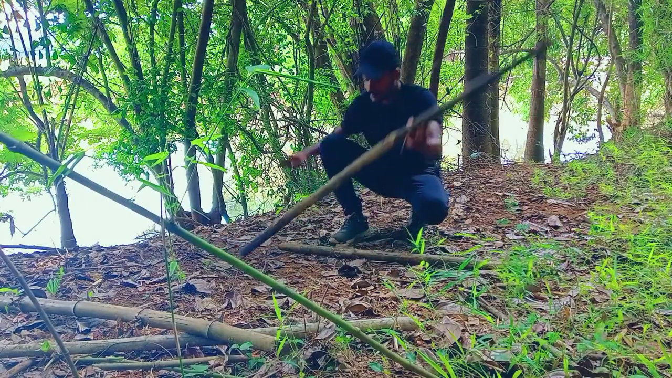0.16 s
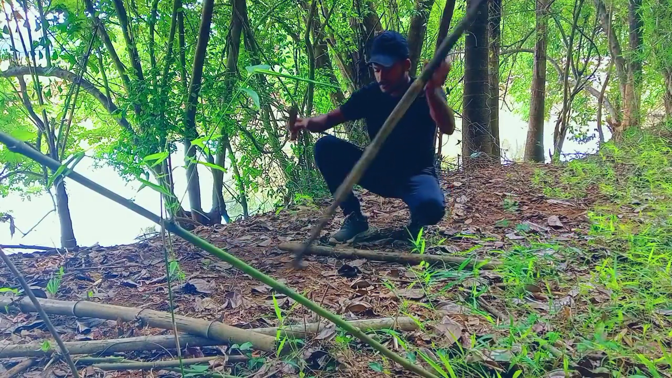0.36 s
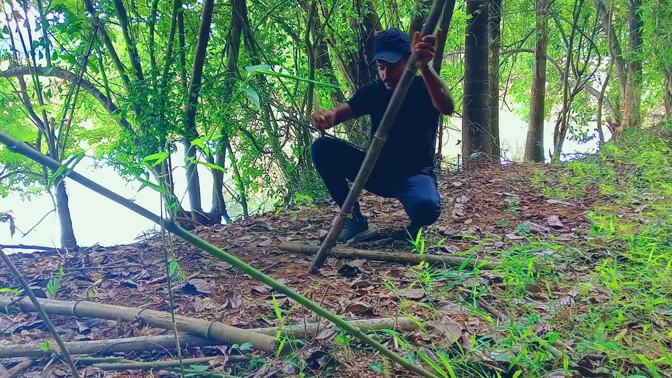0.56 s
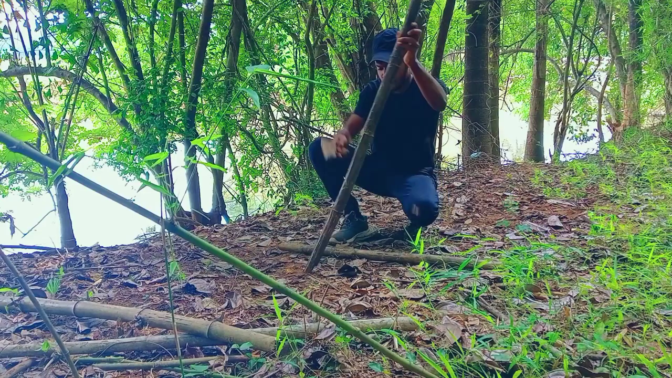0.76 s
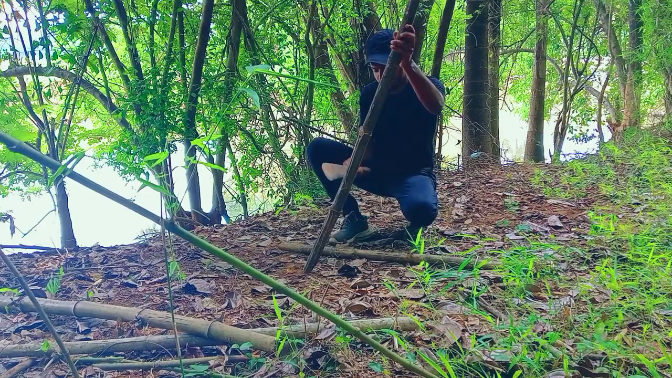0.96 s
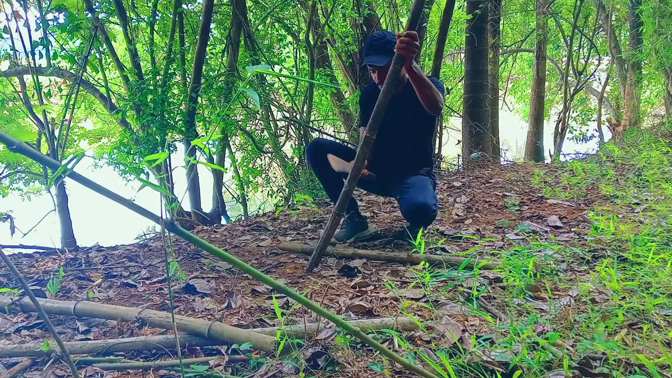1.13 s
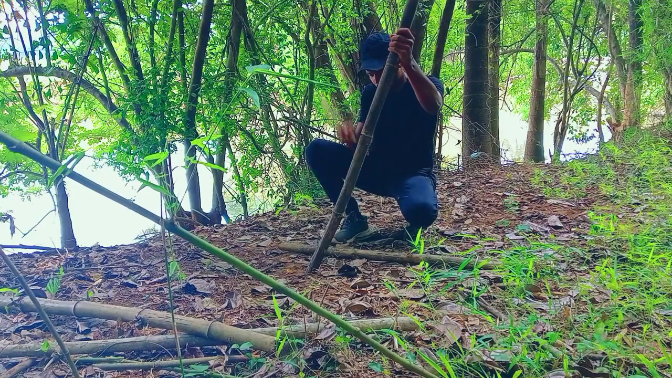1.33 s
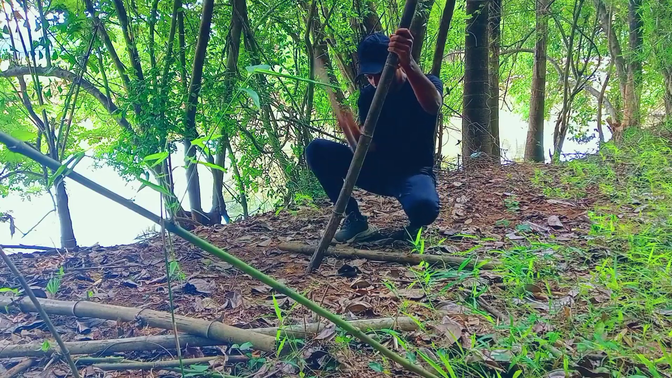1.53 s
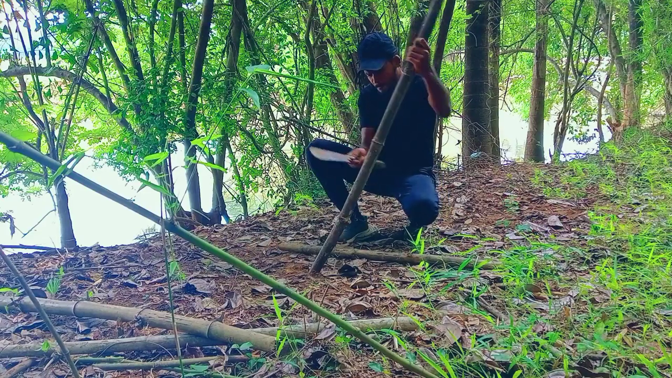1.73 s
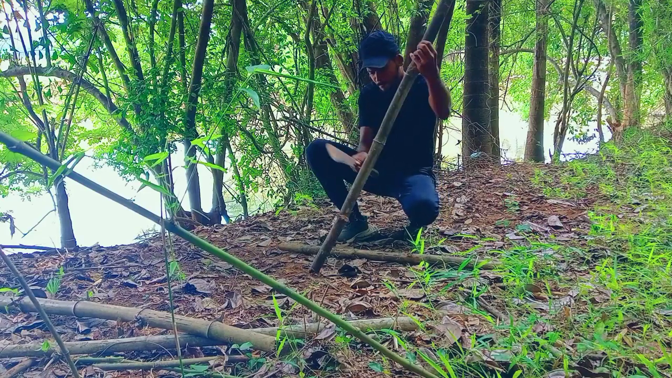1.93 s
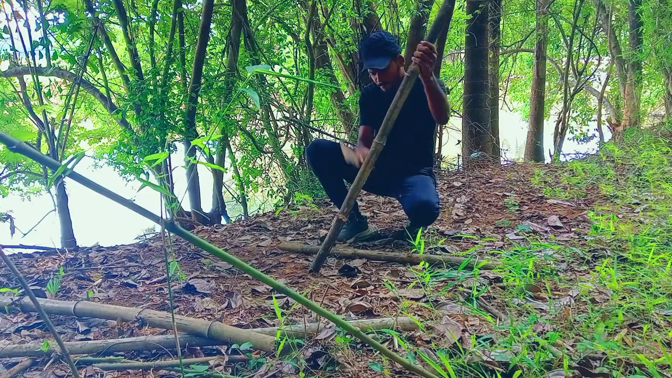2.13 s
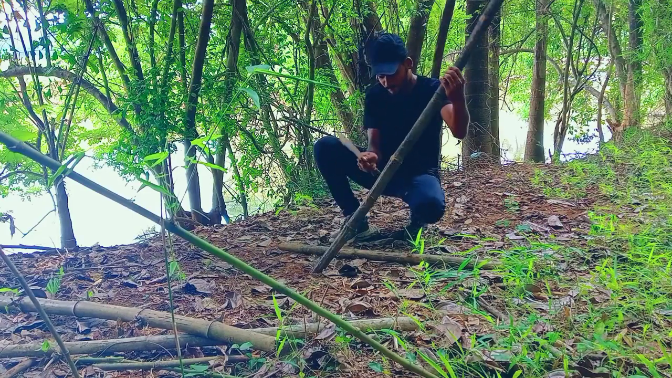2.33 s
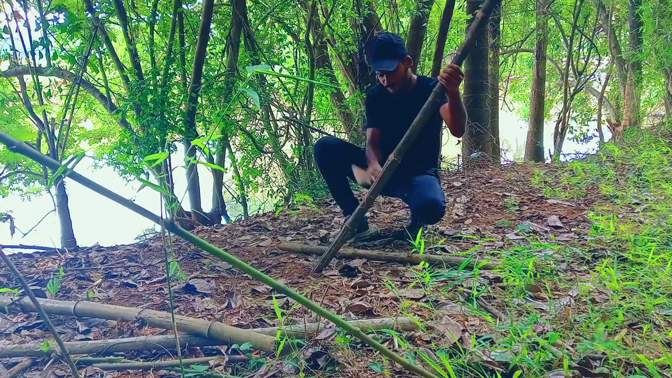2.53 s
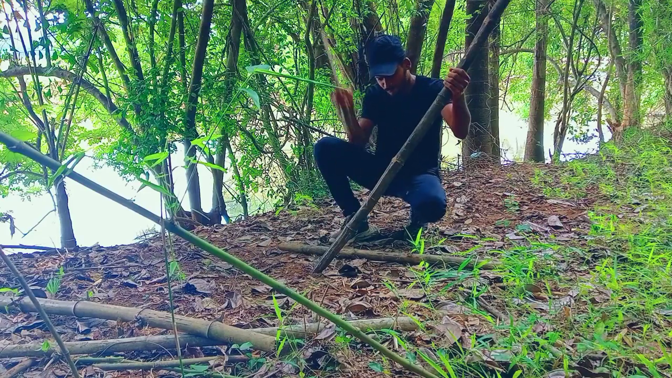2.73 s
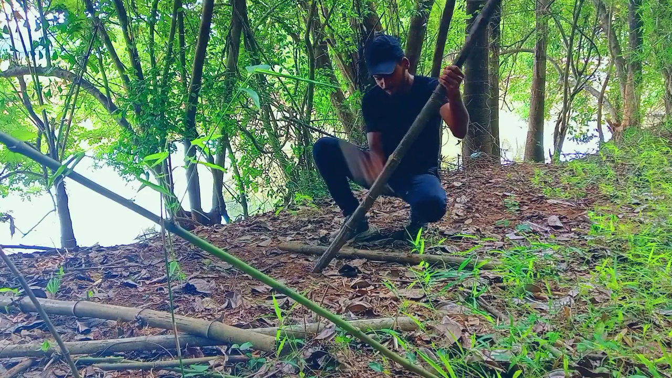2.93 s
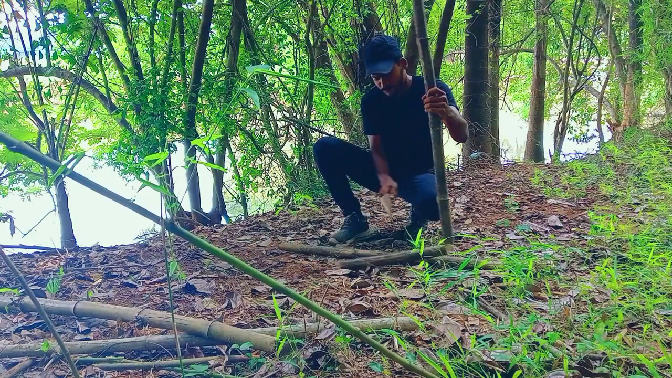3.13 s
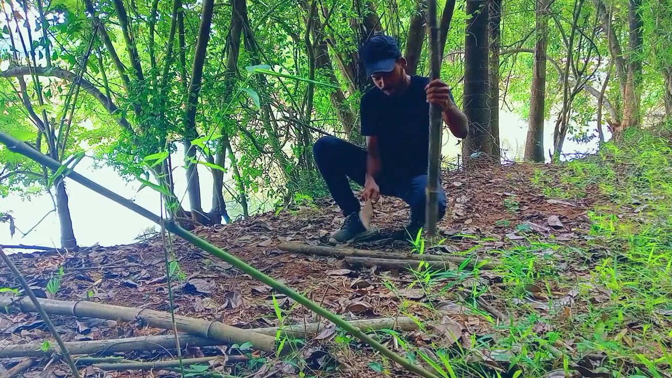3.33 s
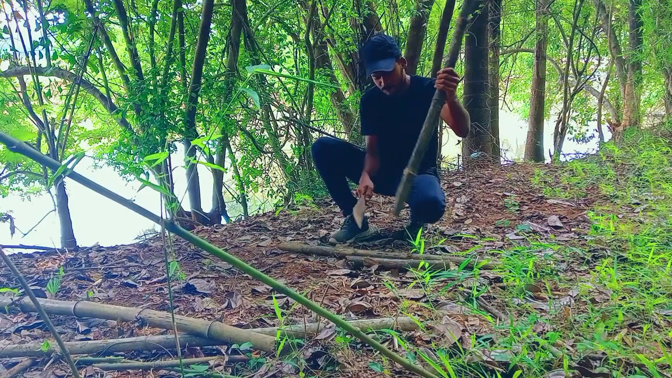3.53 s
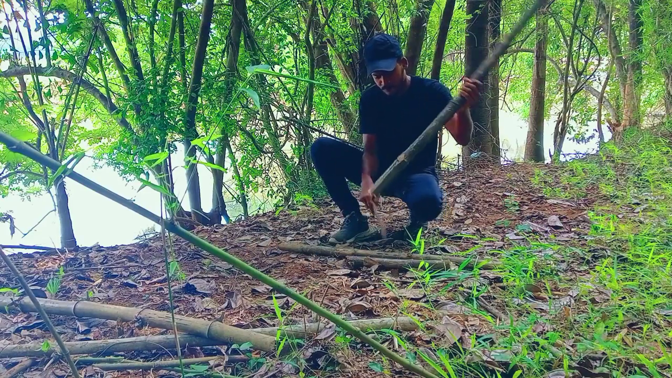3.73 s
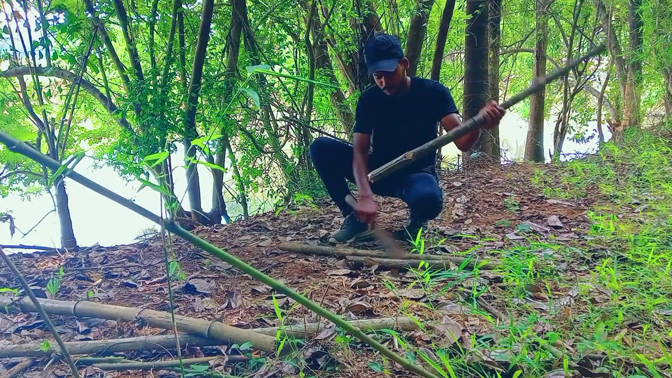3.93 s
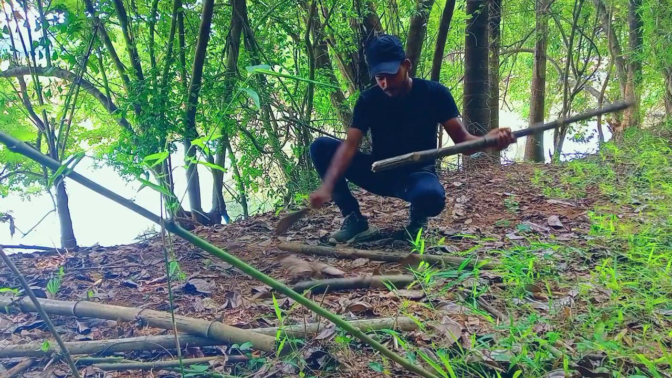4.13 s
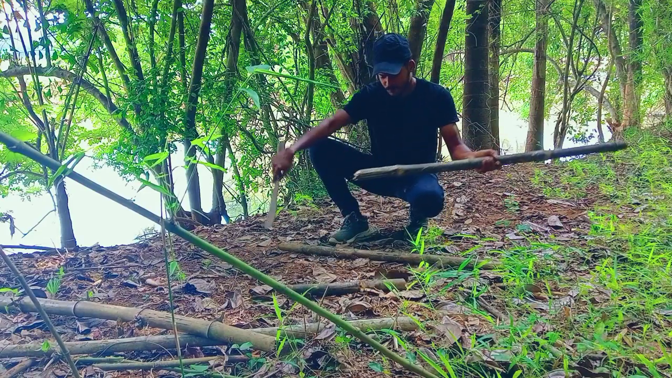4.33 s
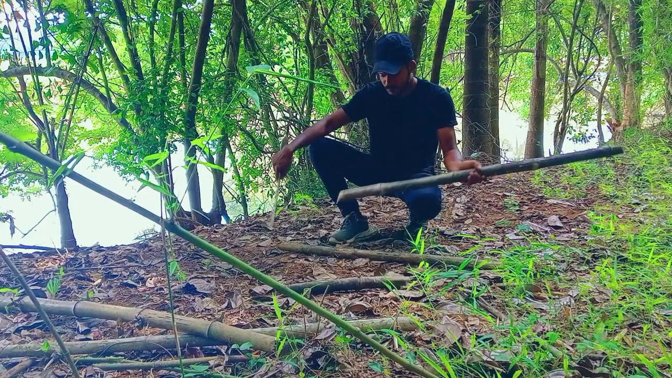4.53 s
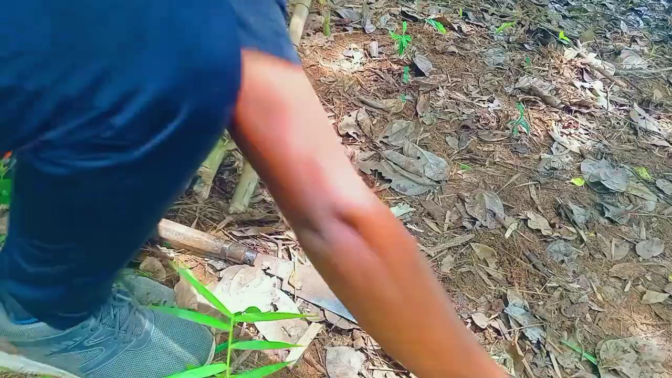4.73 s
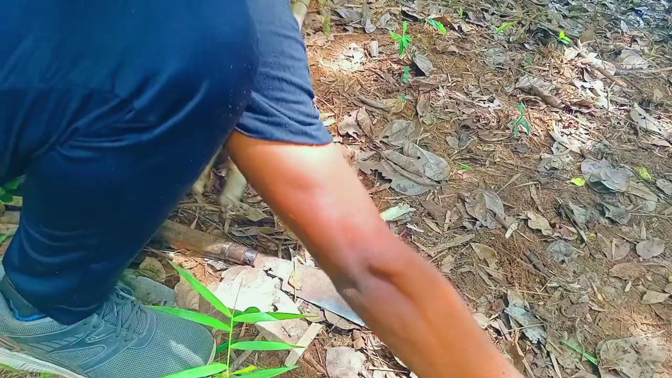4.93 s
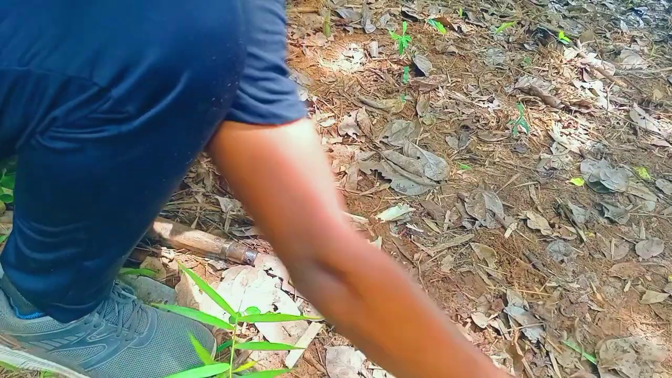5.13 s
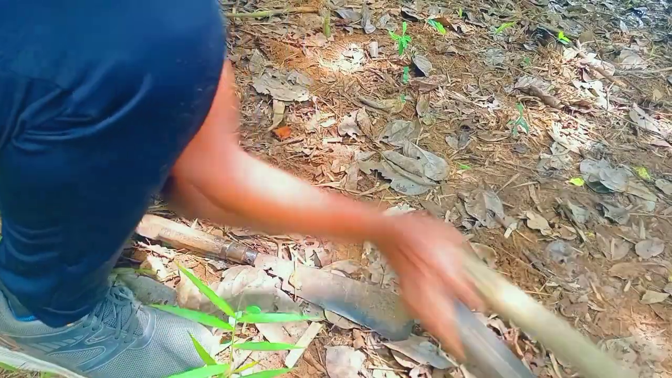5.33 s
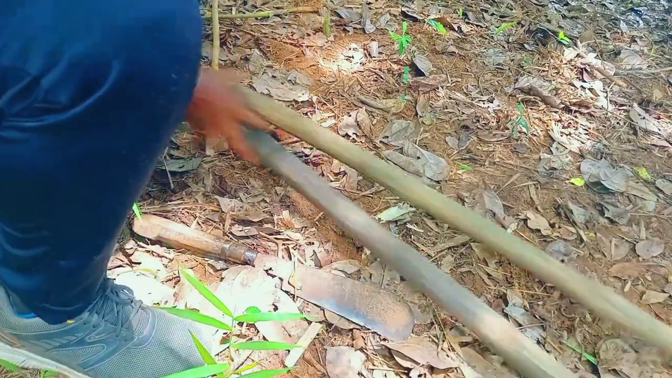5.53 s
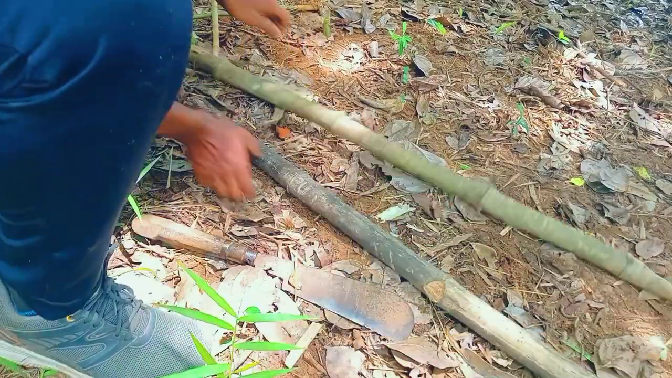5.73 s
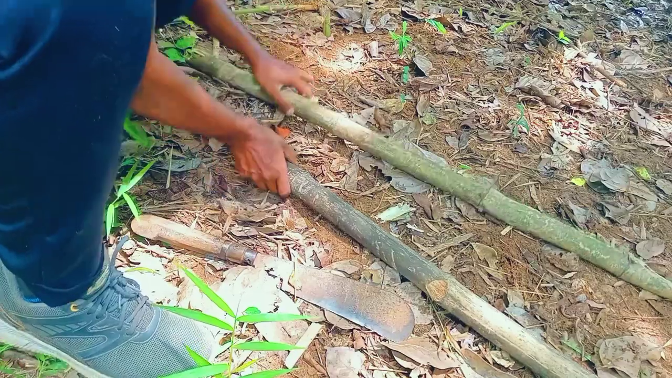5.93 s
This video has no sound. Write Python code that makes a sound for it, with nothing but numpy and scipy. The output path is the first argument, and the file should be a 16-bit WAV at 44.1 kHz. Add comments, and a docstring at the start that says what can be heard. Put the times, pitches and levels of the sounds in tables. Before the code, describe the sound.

A heavy blade chops a thin wooden pole at roughly half-second intervals outdoors, then sticks clack and scrape through dry leaves.

```python
"""A machete chops a green pole on a forest slope: noise cracks, ringing wood modes and low thuds.
Shaped hiss echoes each blow from the trunks. Sticks knock and drag through dry leaves: snaps and rubbing noise.
Gliding tones make soft low thumps and a far bird; narrow noise bands make insects.
Low noise makes the wind, and broad noise the far foliage.
A phone microphone with a hollow near 7.7 kHz and a peak near 10 kHz hears it all."""
import sys
import numpy as np
from scipy import signal
from scipy.fft import rfft, irfft, next_fast_len
from scipy.io import wavfile
from scipy.ndimage import uniform_filter1d, map_coordinates

SR = 44100
rng = np.random.default_rng(int(sys.argv[2]) if len(sys.argv) > 2 else 0)


def wrap_up_sound(samples):
    """Save the sound to the file named by the first command line argument, as 16-bit audio."""
    columns = np.atleast_2d(samples).T
    # keep every value between -1 and 1, then stretch to whole-number steps
    tamed = np.clip(columns, -1, 1)
    steps = np.round(tamed * 32767).astype(np.int16)
    wavfile.write(sys.argv[1], SR, steps)


N = 263277

# All levels are those of the layers before the microphone.
# bites of the blade: t/s, crack peak level/dB (nominal), crack length/s, crack tilt/(dB per octave),
# crack dull above f/Hz, lowest mode level/dB, lowest mode f/Hz, upper modes level/dB, favoured f/Hz,
# ring scale (multiplies the ring times), thud level/dB, thud f/Hz
BLADE_BITES = [(1.5836, -1, 0.0079, 0.3, 59900, -12.5, 548, -12.5, 1400, 0.34, -10, 206),
               (1.5853, -13, 0.0044, -3.5, 60500, -16, 331, -6, 900, 0.5, -18.5, 126.3),
               (2.008, -13, 0.0016, 1, 25000, -21, 431, -18, 1430, 0.58, -32, 157),
               (2.5, -7.5, 0.0051, -0.3, 40000, -11, 468, -6, 794, 0.54, -19, 247),
               (2.9595, -7, 0.0021, 0.5, 60000, -42, 680, -40, 2800, 0.14, -42, 157.2),
               (2.9618, -2.5, 0.0072, 1.1, 60500, -2, 650, -36, 1450, 0.2, -7, 159),
               (3.966, -2.5, 0.0079, 7.8, 8100, -6, 513, -6.5, 1600, 1, -31, 265)]
# sticks knocking on wood or ground: t/s, tick peak level/dB (nominal), lowest mode level/dB,
# lowest mode f/Hz, upper modes level/dB, favoured f/Hz, ring scale (multiplies the ring times)
STICK_KNOCKS = [(0.096, -38, -49, 468, -39, 2250, 1.14), (0.132, -41.5, -56, 490, -41, 2200, 0.9),
                (0.244, -41, -75, 520, -70, 2850, .9), (0.277, -43, -52, 510, -36.5, 2160, 0.72),
                (0.311, -64, -45.5, 520, -62, 1300, 0.95), (0.337, -48, -39.5, 517, -32, 2080, 0.71),
                (0.346, -62, -55, 536, -45.5, 1360, 2.2), (0.364, -57, -47, 545, -43, 2100, 0.99),
                (0.383, -58, -49, 540, -51, 1300, 1.1), (0.409, -47, -56, 706, -50, 2200, 1.9),
                (1.9912, -27, -66, 509, -59, 2500, 0.46), (2.454, -38, -55, 490, -45.5, 1970, 0.68),
                (3.269, -42, -41, 597, -43, 1290, 0.69), (3.913, -47, -31, 504, -29.5, 1260, 0.8),
                (3.922, -48, -40, 500, -34, 1280, 1.5), (3.994, -40, -36.5, 480, -19, 1970, 0.65),
                (4.017, -38, -22, 430, -19, 1360, 0.54), (4.134, -37, -41.5, 512, -44.5, 1030, 4.4),
                (4.156, -42, -40, 513, -32.5, 2070, 1.6), (4.207, -54, -49.5, 503, -45, 1300, 1.8),
                (4.879, -45, -54, 447, -28, 1520, 0.78), (5.221, -25.5, -24.5, 460, -14, 2570, 0.38),
                (5.373, -18.5, -27, 414, -27, 1490, 0.95), (5.413, -15, -31, 440, -22, 1990, 0.46),
                (5.4893, -10, -48, 444, -36, 2500, 0.29), (5.515, -35, -40, 447, -16, 2800, 0.28),
                (5.527, -24, -25, 461, -22.5, 1060, 2.87), (5.553, -16, -59, 444, -46, 2980, 0.52),
                (5.597, -28, -45, 450, -31, 2500, .4)]
# upper modes of the pole: f/Hz (before a small random shift in a blow), level/dB, t60/s at ring scale 1
POLE_MODES = [(773, -2, .03), (992, 0, 0.027), (1254, -3.5, 0.039), (1382, -6.5, 0.041),
              (2070, -2.5, 0.038), (2216, -7, 0.017), (2795, -2.5, 0.033), (4050, -3.5, 0.015)]
# colour of splitting fibres: f/Hz, level/dB (per Hz)
CRACK_COLOUR = [(300, -7.5), (1500, -11.5), (3200, -5.5), (4200, -9.5), (6000, -22), (10400, -28.5),
                (15000, -33)]
# hiss from trunks and flying chips after each blow; the slow swell at 2.968 s is the cut piece falling into the
# leaves: t/s, level/dB before the near boost, swell time constant/s, t60/s, # tilt/(dB per octave), lift of the
# strongest band/dB
ECHO_HISSES = [(1.586, -30.5, 0.004, 0.52, 3, 10.5), (1.992, -57, 0.011, 0.18, 4, 16),
               (2.006, -44.5, 0.0017, 0.3, -2, 8.5), (2.499, -33, 0.0017, 0.24, 0.5, 2.5),
               (2.968, -25, 0.055, 0.62, 5.5, 8), (3.263, -46.5, 0.0083, 0.11, -1, 3),
               (3.912, -48, 0.0027, 0.2, -2.5, 4.5), (3.971, -32, 0.0012, 0.26, -2, 0)]
# answer of the trunks: f/Hz, level/dB (per Hz)
TRUNK_COLOUR = [(100, -44), (250, -4.5), (800, -3.5), (2000, -5), (3100, -10), (4400, -11), (6000, -18),
                (8000, -21.5), (11000, -23.5), (15800, -33)]
# three passages of sticks and hands in dry leaves, each with rows of:
# t/s, level/dB, fizz over it/dB, dull scrape over it/dB
LEAF_PASSAGES = [
    [(0.0, -64, -3, -7), (0.085, -84, -4, -8), (0.1, -59.5, -27, 0), (0.182, -82, -3, -6),
     (0.27, -68, -14, -4), (0.334, -60.5, -7, 3.5), (0.472, -68, -10, 2), (0.55, -82, -29, 7)],
    [(3.98, -45.5, -6, 5), (4.118, -55.5, -4, 0.5), (4.128, -65, -7, -4), (4.138, -51.5, -5, -6),
     (4.162, -49.5, -10, 3), (4.192, -56.5, -6.5, -1.5), (4.45, -83.5, -4, -11)],
    [(4.75, -88, -16, -2), (4.868, -58, -16, 1.3), (4.916, -44, -13, 7), (4.95, -50, -15, .1),
     (5.0, -44, -12, 2.2), (5.042, -45, -18, -7), (5.17, -46, -9.5, 7), (5.222, -40, -6.5, 4.5),
     (5.314, -44.5, -10, 7.5), (5.33, -51.5, -12, -0.5), (5.37, -36.5, -10, 7), (5.466, -38.5, -2.5, 1.2),
     (5.49, -29, -13, 1.5), (5.754, -61, -3.5, -0.3), (5.816, -54, -9, 1.1), (5.856, -66, -1, 2),
     (5.97, -51.5, -6.5, 6)],
]
# colour of each passage, relative to its level: weight/dB, scraped wood/dB, crisp/dB
PASSAGE_COLOURS = [(-5.5, -19, -7.5), (-3, -2.5, -3.5), (-5, -13.5, -6.5)]
# crushed leaves: t/s, level over the rustle/dB, length scale/s
LEAF_CRUNCHES = [(0.103, 10.5, 0.013), (0.13, 4, .005), (0.276, 11.5, 0.0087), (4.881, 7, .01),
                 (4.971, 4.5, 0.02), (5, 4.5, 0.0066), (5.192, 0.5, .011), (5.226, 3, 0.0047),
                 (5.302, 8, 0.016), (5.343, 8.5, 0.013), (5.376, 5.5, 0.012), (5.417, 4, 0.015),
                 (5.45, 2.2, 0.01), (5.517, 6.5, 0.011), (5.593, 3, 0.023), (5.925, 3, 0.022)]
# leaf litter: f/Hz, level/dB (per Hz)
LITTER_COLOUR = [(80, -17), (200, -6.5), (600, -9.5), (1300, -9.5), (2500, -1.5), (4500, -0.5), (7000, -8),
                 (11000, -6.5), (15800, -11.5)]
# soft low thumps that sag in pitch: t/s, level/dB, start f/Hz, length/s
LOW_THUMPS = [(0.01, -48, 102, 0.045), (0.284, -47, 77, 0.093), (0.643, -53, 76, 0.2),
              (0.847, -44.5, 102.4, 0.14), (2.427, -42, 99.5, 0.18), (2.7, -41.5, 91.4, 0.12),
              (3.096, -47.5, 97, 0.16), (3.469, -52, 78.4, 0.045), (4.523, -45.5, 93, 0.17),
              (4.774, -43, 98, .13), (5.076, -48, 120, 0.072), (5.762, -49, 113, 0.12)]
# a far bird: t/s, level/dB before the direct and smeared parts are mixed, start f/Hz, end f/Hz
BIRD_CHIRPS = [(0.61, -68, 5000, 3950), (0.872, -61, 5000, 3890), (1.39, -64, 4950, 3810),
               (3.7, -66, 3500, 4450), (3.85, -73, 4820, 4720)]
# insect bands: f/Hz, width/Hz, level/dB around which the song wavers
INSECT_BANDS = [(3300, 210, -73.5), (12400, 300, -88), (13300, 470, -77), (13920, 40, -91.5)]
# loudness of the wind: t/s, level/dB
WIND_LEVELS = [(0.0, -61), (1.03, -58.5), (1.35, -63), (2.39, -63), (2.63, -57.5), (3.32, -60),
               (3.72, -67.5), (4.04, -57.5), (4.57, -64.5), (4.87, -53), (5.3, -52), (5.6, -54.5),
               (5.97, -57.5)]
# murmur of the wind: f/Hz, level/dB (per Hz)
WIND_COLOUR = [(20, -40.5), (45, -9.5), (80, -7.5), (120, -6), (200, -19), (400, -54)]
# loudness of the far forest, around which it wavers: t/s, level/dB
FOREST_LEVELS = [(0, -60.5), (1.4, -63), (2.01, -58), (2.4, -62.5), (3.4, -60.5), (4.1, -65.5),
                 (4.85, -60.5), (5.97, -54.5)]
# far forest: f/Hz, level/dB (per Hz)
FOREST_COLOUR = [(60, -26.5), (110, -7.5), (200, -5), (350, -9), (800, -12), (1600, -12), (2800, -15),
                 (4100, -15), (5000, -25.5), (5800, -31), (8000, -36.5), (12000, -42), (15800, -48)]
# hollow and peak of the microphone port: f/Hz, width/Hz, level/dB
MIC_RESONANCES = [(7710, 3800, -4), (10335, 1550, 11.5)]

TICK_S, TICK_TILT_DB, TICK_DULL_HZ = 0.0087, 3, 29700  # the crack of a stick knock; tilt per octave
KNOCK_THUD_DB, KNOCK_THUD_HZ = -14, 203.3  # thud level relative to the lowest mode
CRACK_CREST_DB, BITE_DB = 7.5, -4  # crack peak over rms; the edge's ping relative to the crack peak
BLOW_BASS_HZ = 66  # the blows carry little sound below this
STRONGEST_HZ = 3545  # centre of the lifted echo band
NEAR_DB, NEAR_T60_S = 4.5, 0.07  # the nearest trunks answer louder and die first
CRUSH_SHARE, RELAX_SHARE = 0.54, 1.4  # rise and fall of a crunch, as shares of its length scale
SAG_OCT_PER_S = 4.7
CHIRP_S = 0.04
SONG_END_S = 4.86  # the insects fall silent
TOP_HZ = 15700  # upper band limit


def blows():
    """Fibres crack, the pole rings the modes that the struck spot favours, the soil takes a damped push."""
    out, t = np.zeros(N), np.arange(SR // 5) / SR

    def ring(hz, t60):
        """A mode dies away by 60 dB in t60 seconds, after a soft start."""
        return amp(-60 * t / t60) * np.sin(2 * np.pi * hz * t) * (1 - np.exp(-t / 0.001))

    knocks = [(s, tick_db, TICK_S, TICK_TILT_DB, TICK_DULL_HZ, low_db, low_hz, upper_db, spot_hz,
               scale, low_db + KNOCK_THUD_DB, KNOCK_THUD_HZ)
              for s, tick_db, low_db, low_hz, upper_db, spot_hz, scale in STICK_KNOCKS]
    for (s, crack_db, length, tilt_db, dull_hz, low_db, low_hz, upper_db, spot_hz,
         scale, thud_db, thud_hz) in BLADE_BITES + knocks:
        splinters = np.exp(-(t / length) ** 1.55 * 2.25) * (1 - np.exp(-t / 0.0003))
        noise = coloured(rng.standard_normal(len(t)), CRACK_COLOUR, tilt_db)
        crack = amp(crack_db - CRACK_CREST_DB) * splinters * noise
        crack = filtered(crack, lambda f: 1 / (1 + 1j * f / dull_hz) ** 4)

        # each blow varies the mode levels and pitches a little
        luck = rng.standard_normal((len(POLE_MODES), 2))
        upper = np.zeros(len(t))
        for (hz, db, t60), (level_luck, pitch_luck) in zip(POLE_MODES, luck):
            spot_db = -24 * np.log2(hz / spot_hz) ** 2  # modes far from the favoured pitch are weak
            mode = ring(hz * (1 + 0.019 * pitch_luck), t60 * scale)
            upper += amp(db + 1.5 * level_luck + spot_db) * mode
        wood = amp(low_db) * ring(low_hz, 0.06 * scale) + amp(upper_db) * upper

        # the edge meets hard fibres with a very short ping
        bite_hz = 3500 * (1 + 0.072 * luck[0, 1])
        bite = amp(crack_db + BITE_DB - 60 * t / 0.0027) * np.sin(2 * np.pi * bite_hz * t)
        thud = amp(thud_db) * ring(thud_hz, 0.091 * scale)
        add(out, s, crack - bite + wood - thud)
    return filtered(out, lambda f: (1j * f / (BLOW_BASS_HZ + 1j * f)) ** 2)


def echoes():
    """Scattered hiss that swells and dies after a blow, the treble very slightly slower to die."""
    out, t = np.zeros(N), np.arange(SR) / SR
    chips = grains(count=9000, hz=4660, spread=0.7, cycles=1.44, uneven_db=2.0)
    spray = patchy(rng.standard_normal(N) + 0.41 * chips, depth_db=0.4) * amp(0.6 * wobble(90))
    for s, db, swell, t60, tilt_db, lift_db in ECHO_HISSES:
        def lift(hz):
            octaves = np.log2(hz / STRONGEST_HZ + 0.0074)
            return amp(lift_db * np.exp(-(octaves / 0.58) ** 2))

        lifted = filtered(spray[round(s * SR):][:SR], lift)
        hiss = coloured(lifted, TRUNK_COLOUR, tilt_db)
        high = filtered(hiss, lambda hz: hz ** 2 / (hz ** 2 + 6000 ** 2))
        fading = (hiss - high) * amp(-60 * t / t60) + high * amp(-60 * t / (1.005 * t60))
        near = 1 + amp(NEAR_DB - 60 * t / NEAR_T60_S)
        add(out, s, amp(db) * (1 - np.exp(-t / swell)) * fading * near)
    return out


def leaves():
    """Brittle snaps over friction hiss, clumped into crunches; the same rubbing sounds the stick's modes."""
    t = np.arange(N) / SR
    snaps = grains(count=20000, hz=3820, spread=0.78, cycles=4.0, uneven_db=2.5)
    rubbing = patchy(rng.standard_normal(N) + 0.5 * snaps, depth_db=2.0)
    litter = coloured(rubbing, LITTER_COLOUR)

    # split the litter into four bands, from low to high
    under = [filtered(litter, lambda f: 1 / (1 + (f / edge_hz) ** 4)) for edge_hz in (1200, 3200, 6500)]
    body, dull = unit(under[0]), unit(under[1] - under[0])
    crisp, fizz = unit(under[2] - under[1]), unit(litter - under[2])

    modes = [(541, 0.0035, 0.066)] + POLE_MODES  # f/Hz, level/dB, t60/s

    def stick_response(f):
        return sum(amp(db) * 1j * f / t60 / (hz * hz - f * f + 2.2j * f / t60) for hz, db, t60 in modes)

    stick = unit(filtered(rubbing, stick_response))

    crush_db = np.zeros(N)
    for s, db, length in LEAF_CRUNCHES:
        share = np.where(t < s, CRUSH_SHARE, RELAX_SHARE)
        crush_db += db * np.exp(-((t - s) / share / length) ** 2)

    out = np.zeros(N)
    for rows, (weight_db, wood_db, crisp_db) in zip(LEAF_PASSAGES, PASSAGE_COLOURS):
        db, fizz_db, scrape_db = curves(rows)
        moving = (t >= rows[0][0]) & (t <= rows[-1][0])
        rustle = amp(scrape_db) * dull + amp(crisp_db) * crisp + amp(fizz_db) * fizz
        handling = amp(weight_db) * body + amp(wood_db) * stick
        out += moving * amp(db) * (rustle + handling)
    return out * amp(crush_db + 1.5 * wobble(60))


def thumps():
    """Soft low tones whose pitch sags as they swell and fade."""
    out = np.zeros(N)
    for s, db, start_hz, length in LOW_THUMPS:
        end_hz = start_hz * 2 ** (-SAG_OCT_PER_S * length)
        add(out, s, amp(db) * glide(start_hz, end_hz, length, lean=0.61))
    return out


def bird():
    """Short gliding chirps, smeared among the trunks by a dying noise tail."""
    chirps, t = np.zeros(N), np.arange(SR // 2) / SR
    for s, db, start_hz, end_hz in BIRD_CHIRPS:
        add(chirps, s, amp(db) * glide(start_hz, end_hz, CHIRP_S, lean=1.4))
    tail = amp(-60 * t / 1.1) * rng.standard_normal(len(t))
    smeared = signal.fftconvolve(chirps, tail / np.linalg.norm(tail))[:N]
    return amp(-3) * chirps + amp(8) * smeared


def insects():
    """Narrow noise bands waver slowly in level, then stop with a brief fade."""
    song = np.zeros(N)
    for hz, width, db in INSECT_BANDS:
        band = unit(filtered(rng.standard_normal(N), lambda f: np.exp(-((f - hz) / width) ** 2)))
        song += amp(db + 2.2 * wobble(1.6)) * band
    return song * np.clip((SONG_END_S - np.arange(N) / SR) / 0.021, 0, 1)


def wind():
    """Low noise follows the gusts on the microphone."""
    return amp(curves(WIND_LEVELS)[0]) * coloured(rng.standard_normal(N), WIND_COLOUR)


def far_foliage():
    """Patchy broad noise for distant leaves, slowly varying in level."""
    rustle = coloured(patchy(rng.standard_normal(N), depth_db=2.5), FOREST_COLOUR)
    return amp(curves(FOREST_LEVELS)[0] + 0.19 * wobble(4.7)) * rustle


def glide(start_hz, end_hz, length, lean):
    """A soft-edged tone slides between two pitches; lean under 1 peaks early, over 1 late."""
    u = np.arange(int(length * SR)) / (length * SR)
    pitch = start_hz * (end_hz / start_hz) ** u
    return np.sin(np.pi * u ** lean) ** 0.98 * np.sin(2 * np.pi * np.cumsum(pitch) / SR)


def grains(count, hz, spread, cycles, uneven_db):
    """Tiny brittle snaps: damped sines of scattered pitch and size at random moments."""
    luck, t = rng.random((count, 2)), np.arange(128) / SR
    pitch = np.clip(hz * np.exp(spread * rng.standard_normal((count, 1))), 300, 15000)
    size = amp(-uneven_db * np.log(luck[:, 1:] + 0.0078))  # a few snaps are much louder
    snaps = size * np.exp(-t * pitch / cycles) * np.sin(2 * np.pi * pitch * t)
    where = (luck[:, :1] * N).astype(int) + np.arange(128)
    return unit(np.bincount(where.ravel(), snaps.ravel(), N + 128)[:N])


def patchy(x, depth_db):
    """Small random patches of time and pitch come out louder or softer."""
    z = signal.stft(x, nperseg=256)[2]
    field = uniform_filter1d(rng.standard_normal(z.shape), size=4, axis=0)
    field = uniform_filter1d(field, size=4, axis=1)
    return signal.istft(z * amp(depth_db * unit(field)), nperseg=256)[1][:len(x)]


def amp(db):
    """Turns dB into a plain multiplier."""
    return 10 ** (np.asarray(db) / 20)


def unit(x):
    """Scales x to rms 1."""
    return x / np.sqrt(np.mean(x ** 2) + 1e-20)


def along(points, hz):
    """Reads a curve of (f/Hz, value) points on a log pitch axis."""
    f, v = np.transpose(points)
    return np.interp(np.log(hz + 1), np.log(f + 1), v)


def curves(rows):
    """One value per sample for each column after the time."""
    s, *cols = np.transpose(rows)
    return [np.interp(np.arange(N) / SR, s, c) for c in cols]


def wobble(rate):
    """A smooth random curve, with rate knots a second."""
    knots = rng.standard_normal(int(N * rate / SR) + 4)
    return map_coordinates(knots, [np.arange(N) * rate / SR])


def filtered(x, response):
    """Shapes the spectrum of x by a response that depends on frequency."""
    m = next_fast_len(len(x) + 8192)  # room for the filter's tail
    return irfft(rfft(x, m) * response(np.fft.rfftfreq(m, 1 / SR)), m)[:len(x)]


def coloured(x, spectrum, tilt_db=0):
    """Shapes x by a spectrum tilted about 3 kHz, in dB per octave, then scales it to rms 1."""
    def response(hz):
        return amp(along(spectrum, hz) + tilt_db * np.log2(hz / 3000 + 0.018))
    return unit(filtered(x, response))


def add(track, s, sound):
    """Mixes a sound into a track at s seconds."""
    part = track[round(s * SR):][:len(sound)]
    part += sound[:len(part)]


def scene():
    """All layers together, from the chopping to the background."""
    near = blows() + echoes() + leaves() + thumps()
    far = bird() + insects() + wind() + far_foliage()
    return (near + far)[None]


def record(dry):
    """Port resonances, a bass cut, and almost nothing above the band limit."""
    def response(f):
        gain = (1j * f / (55 + 1j * f)) ** 3
        for hz, width, db in MIC_RESONANCES:
            spring = hz * hz - f * f
            damping = 1j * f * width
            gain = gain * (spring + damping * amp(db / 2)) / (spring + damping / amp(db / 2))
        return gain / (1 + (f / TOP_HZ) ** 120)
    return filtered(dry[0], response)[None]


dry = scene()
out = record(dry)
wrap_up_sound(out)
```